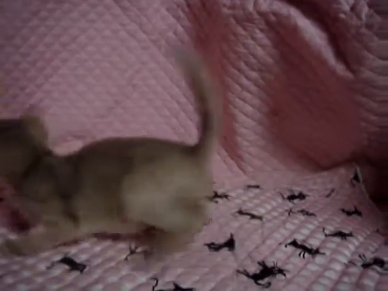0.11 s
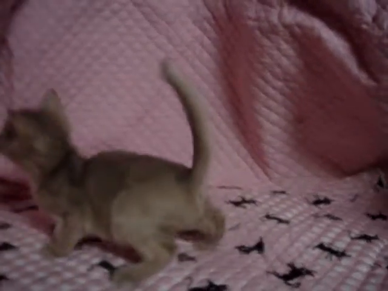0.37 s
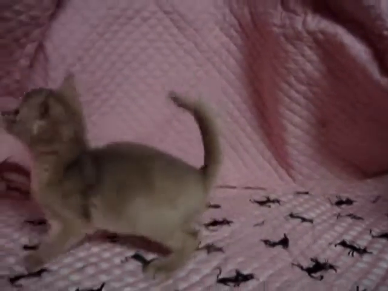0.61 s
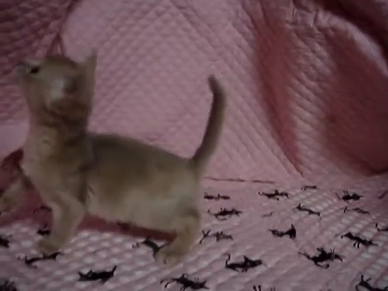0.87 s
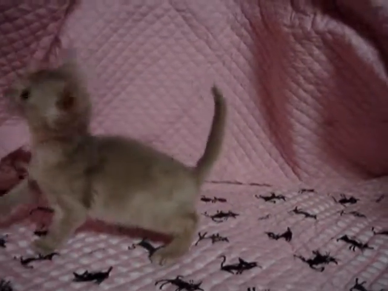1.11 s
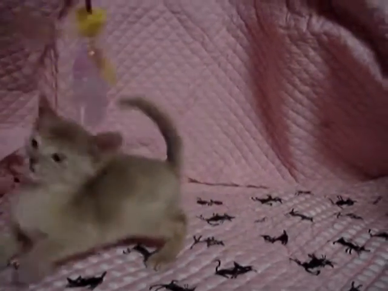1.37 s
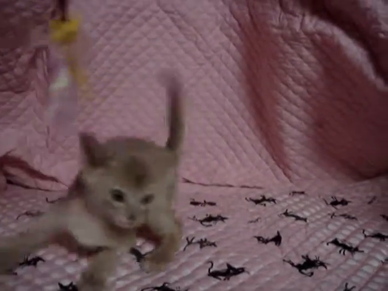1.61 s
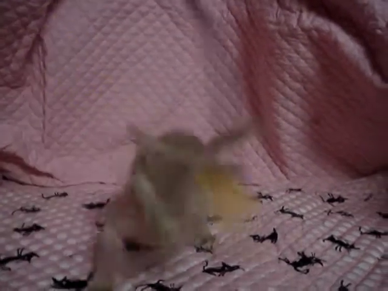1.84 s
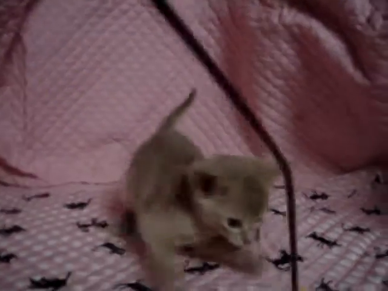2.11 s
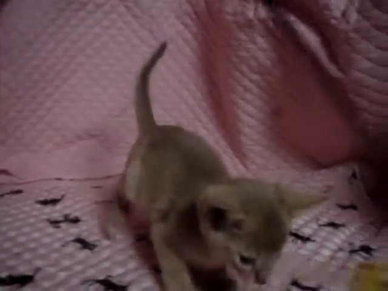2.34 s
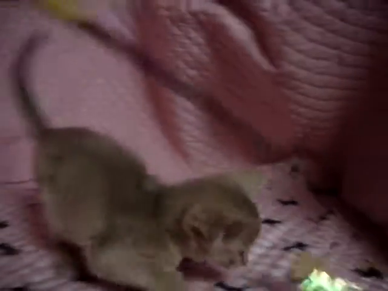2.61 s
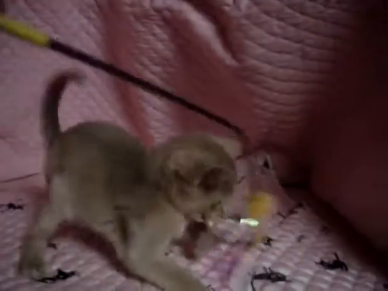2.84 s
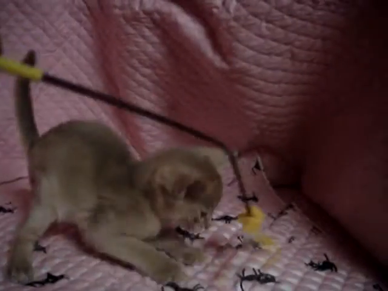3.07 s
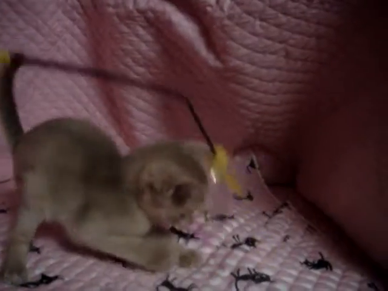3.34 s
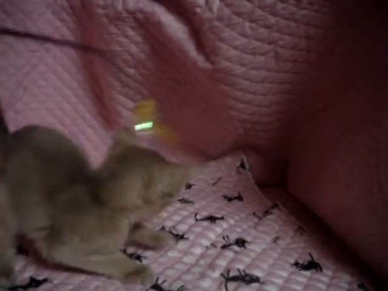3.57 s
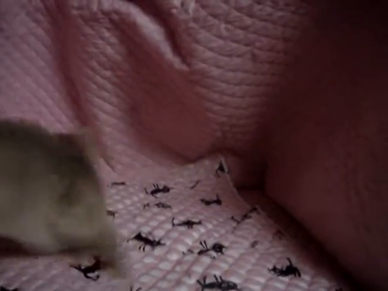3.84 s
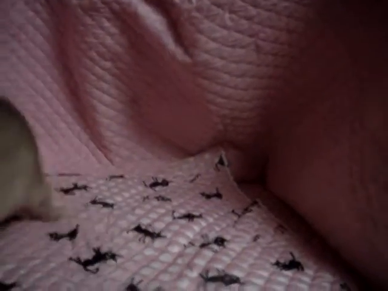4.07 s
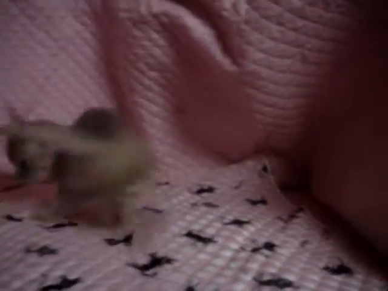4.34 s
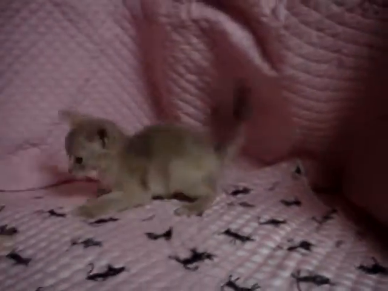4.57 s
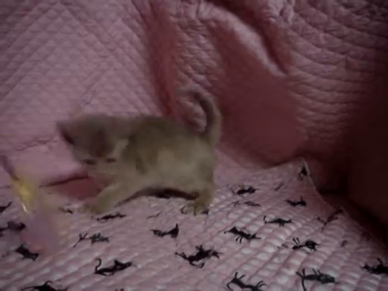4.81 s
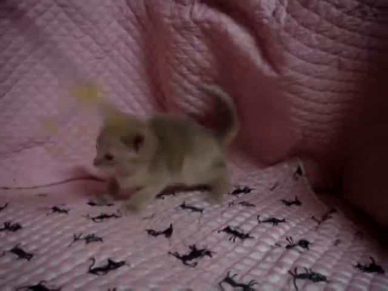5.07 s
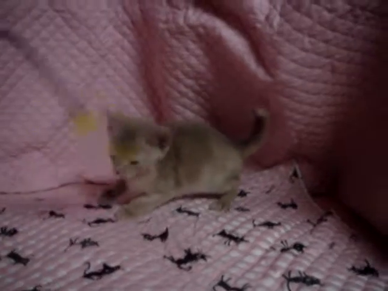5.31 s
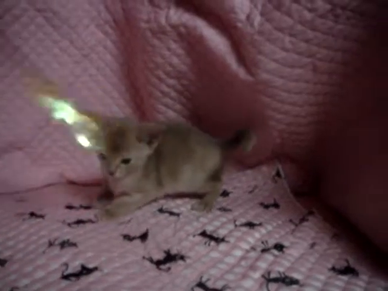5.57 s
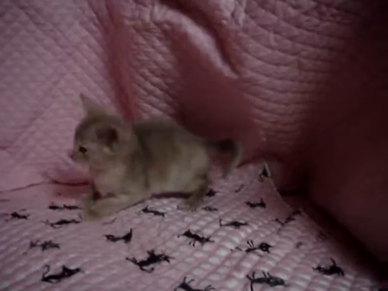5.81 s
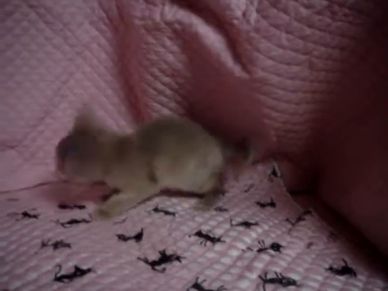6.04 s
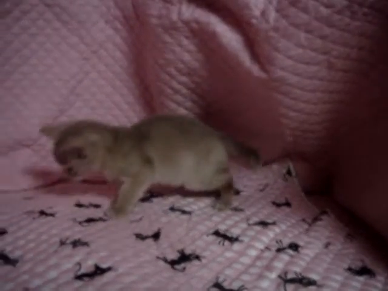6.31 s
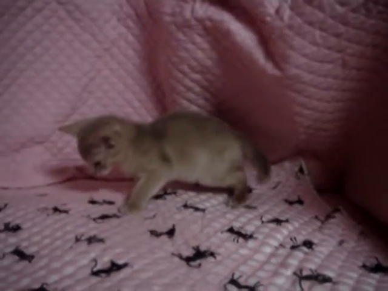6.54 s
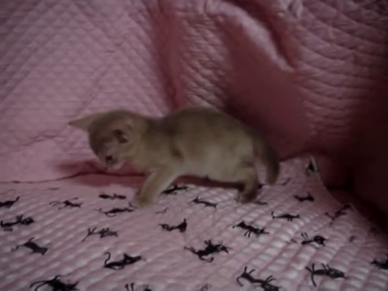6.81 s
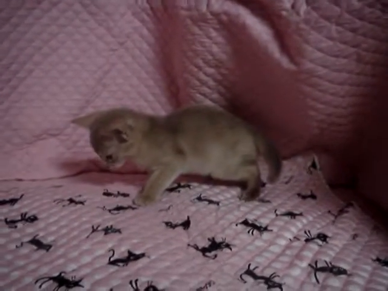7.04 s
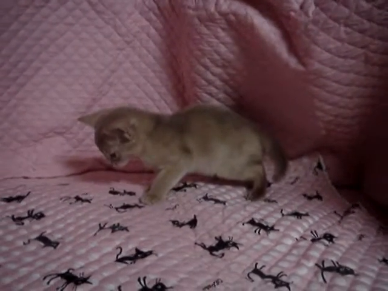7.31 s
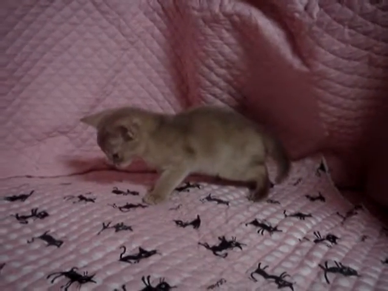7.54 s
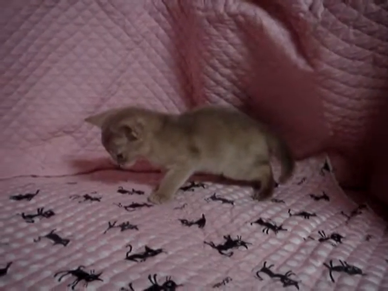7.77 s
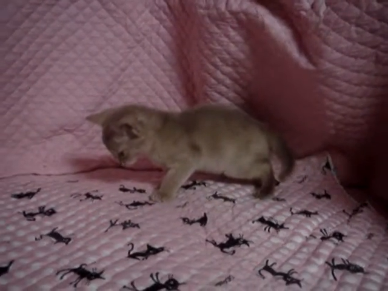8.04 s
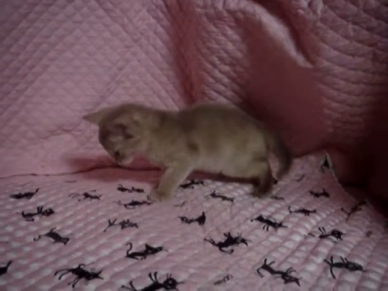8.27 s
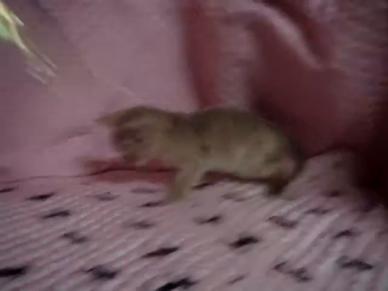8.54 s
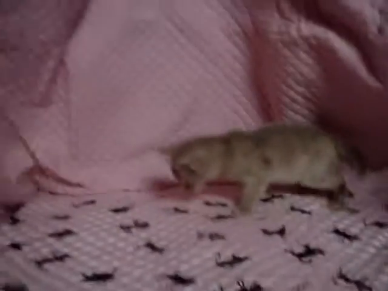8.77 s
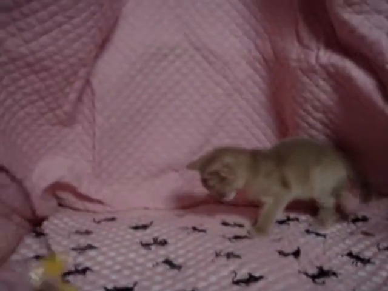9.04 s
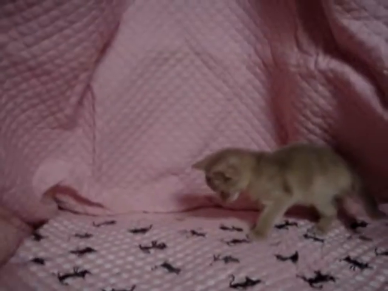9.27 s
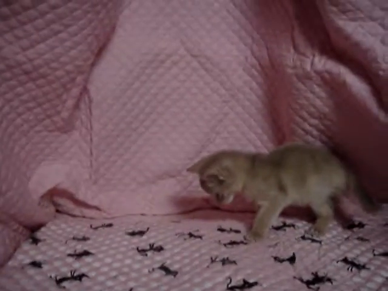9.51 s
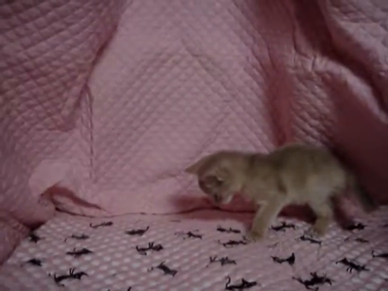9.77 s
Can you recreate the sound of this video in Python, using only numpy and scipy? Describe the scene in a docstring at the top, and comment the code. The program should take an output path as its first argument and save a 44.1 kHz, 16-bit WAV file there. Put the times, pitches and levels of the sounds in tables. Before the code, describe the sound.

Small claws scratch and snap across padded cloth in uneven bursts, with soft paw thuds, beneath steady room hiss and a thin high whine.

```python
"""On a quilted blanket, close to a small camera, a kitten scrabbles, pounces and bats a foil toy.
Cloth and foil crinkle in dense grains of noise; claws catch in short swells of noise (rips) and
ringing clicks (snaps); narrow noise chirps; paws thud as soft, low, dying tones.
Under it lie filtered noise for room and circuit hiss, and the camera's whine, steady tones whose
sign flips at every frame."""
import sys
import numpy as np
from scipy import signal
from scipy.fft import rfft, irfft, next_fast_len
from scipy.io import wavfile
from scipy.ndimage import uniform_filter1d, minimum_filter1d

SR = 44100
rng = np.random.default_rng(int(sys.argv[2]) if len(sys.argv) > 2 else 0)


def undo_db(level):
    """Turn decibels back into plain size, where 20 dB means ten times bigger."""
    steps = np.asarray(level, float) / 20
    return 10 ** steps


def wrap_up_sound(samples):
    """Save the sound to the file named by the first command line argument, as 16-bit audio."""
    columns = np.atleast_2d(samples).T
    # keep every value between -1 and 1, then stretch to whole-number steps
    tamed = np.clip(columns, -1, 1)
    steps = np.round(tamed * 32767).astype(np.int16)
    wavfile.write(sys.argv[1], SR, steps)


N = 436149
T = np.arange(N) / SR  # time of each sample, s


def unit(x):
    """Scale a sound to an rms of 1."""
    return x / np.sqrt(np.mean(x ** 2))


def colour(x, points, rings=()):
    """Filter by (hz, db) points and optional resonances (hz, width_hz, db); rms 1."""
    size = next_fast_len(len(x))
    hz = np.maximum(np.arange(size // 2 + 1) * SR / size, 1)
    point_hz, point_db = np.transpose(points)
    db = np.interp(np.log(hz), np.log(point_hz), point_db)
    for ring_hz, width_hz, ring_db in rings:
        db = db + ring_db / (1 + (2 * (hz - ring_hz) / width_hz) ** 2)
    return unit(irfft(rfft(x, size) * undo_db(db), size)[:len(x)])


def band(x, hz, share):
    """Resonance around hz; its width is a share of the centre."""
    b, a = signal.iirpeak(min(hz, 10000), 1 / max(share, .1), fs=SR)
    return signal.lfilter(b, a, x)


def walk(rate):
    """Random levels that slide to a new value every 1 / rate s; rms near 1."""
    hold = int(SR / rate)
    steps = np.repeat(rng.standard_normal(N // hold + 1), hold)
    return unit(uniform_filter1d(steps, hold))[:N]


def crinkle(rate, spread_db, hiss):
    """Fibres slip as random ticks of very unequal size over a finer hiss; rate is ticks per s."""
    sizes = undo_db(spread_db * np.minimum(rng.exponential(size=N), 3.5))
    ticks = (rng.random(N) < rate / SR) * rng.standard_normal(N) * sizes
    return unit(unit(ticks) + hiss * rng.standard_normal(N))


def patchy(x, top_db, patchy_db, rate):
    """Different folds speak in different bands: each third-octave flickers alone; top_db tilts the treble."""
    spectrum, hz = rfft(x), np.arange(N // 2 + 1) * SR / N
    place = 3 * np.log2(np.maximum(hz, 1000) / 1000)  # third-octaves above 1000 Hz
    out = 0
    for k in range(12):
        part = irfft(spectrum * np.maximum(1 - abs(place - k), 0), N)
        tilt = np.clip((k - 6) / 3, -.5, 1)
        out = out + part * undo_db(patchy_db * walk(rate) + top_db * tilt)
    return out / undo_db(patchy_db ** 2 * np.log(10) / 20)  # offsets the power the flicker adds


# Faint fidgeting between the strokes: start_s, level_db
FIDGETING = [(0, -59.5), (.8, -66.5), (1.0, -49.5), (1.12, -58), (1.4, -60.5), (1.75, -56.5), (1.95, -57),
             (2.3, -53.5), (2.4, -57), (2.8, -57), (3.7, -63), (4.0, -53.5), (4.85, -58.5), (5.3, -63.5),
             (5.9, -55.5), (8.0, -58.5), (8.6, -58.5), (9.6, -58.5), (9.89, -59)]
# Paw strokes dragging over the quilt: start_s, length_s, level_db, change_db (along the stroke),
# treble_db (tilt of the treble against the rest)
PAW_STROKES = [(0.202, 0.2, -54, 9, -0.5), (0.409, 0.17, -43.5, -6, 0.5), (0.584, 0.07, -45, 2.5, 2.5),
               (0.778, 0.033, -48, 2, -4), (1.058, 0.019, -53, 0, 2), (1.735, 0.027, -49.5, 0, -6),
               (1.997, .02, -53, 2, -5), (2.618, 0.057, -50.5, 11, 3), (2.686, 0.026, -39.5, -4, -1.5),
               (2.724, 0.075, -47.5, -8, -2), (3.954, 0.051, -55, 10.5, -8), (4.031, 0.22, -54.5, 6, -8),
               (4.321, 0.048, -48.5, 7.5, -9.5), (4.462, 0.13, -57, 7.5, -8), (4.611, 0.076, -35.5, -25, 6),
               (4.739, 0.12, -49, -5, 0), (5.02, 0.1, -60, 0, -4), (5.724, 0.055, -40, -5, -2),
               (5.8, 0.086, -53.5, 4, 0), (5.97, 0.13, -48, 9.5, -1), (6.107, .035, -38.5, -2, -2),
               (6.168, 0.064, -31, -6.5, -0.5), (6.34, 0.043, -43.5, 10, 1), (6.386, 0.084, -36.5, 6.5, -2),
               (6.48, .03, -43.5, 1, 2), (6.524, 0.077, -32.5, 2.5, 0), (6.614, 0.056, -26, -11, -2),
               (6.701, 0.03, -45, 7, -0.5), (6.744, 0.12, -32.5, -10, 0.5),
               (6.894, 0.029, -37.5, 14.5, 1.5), (6.944, 0.11, -27.5, -15, 1), (7.109, 0.08, -35, 2.5, 1),
               (7.209, 0.064, -39.5, -8.5, 4.5), (7.295, 0.031, -36.5, 2, 0.5),
               (7.342, 0.091, -31, -10.5, -1), (7.518, 0.078, -47.5, 13, -0.5),
               (7.613, 0.072, -35, -4, -3.5), (7.702, 0.052, -50, 7, 1), (7.78, 0.062, -28.5, -11.5, -1.5),
               (7.873, 0.078, -47, 9.5, 0), (8.026, 0.035, -47.5, -7, -1.5), (8.644, 0.088, -59, -5, 2),
               (8.832, 0.061, -51, 1, -6), (8.905, 0.027, -38.5, 5.5, -1), (9.072, 0.059, -47.5, 4, -3.5),
               (9.16, .05, -42.5, -5, -1.5), (9.232, 0.042, -54, -1, -1), (9.348, 0.034, -32, -12, -3.5),
               (9.469, 0.04, -45, -4, -4.5), (9.553, 0.045, -53, 1, -2)]


def effort():
    """Fidgeting plus strokes that grip fast, swell or sag, and let go: gain and treble tilt in dB."""
    grip_s, let_go_s = 0.0068, 0.0077  # quick onset; time constant of the dying away
    fidget_treble_db = 1
    gain = undo_db(np.interp(T, *np.transpose(FIDGETING)))
    treble = gain * fidget_treble_db
    for start_s, length_s, level_db, change_db, treble_db in PAW_STROKES:
        before_s = np.maximum(start_s - T, 0)
        after_s = np.maximum(T - start_s - length_s, 0)
        edges = np.exp(-(before_s / grip_s) ** 2 - after_s / let_go_s)
        progress = np.clip((T - start_s) / length_s, 0, 1)
        stroke = edges * undo_db(level_db + change_db * progress)
        gain = gain + stroke
        treble = treble + stroke * treble_db
    return gain, treble / gain  # tilt averaged by how loud each part is


# Tone of the bright grains, shared by the rips: pitch_hz, level_db (relative)
BRIGHT_COLOUR = [(300, -37.5), (1500, -4), (2200, -1), (3000, 0), (5500, 2.5), (7000, 4), (8400, 4.5),
                 (9800, 4.5), (11000, -22.5)]
# Tone of the padded cloth's dull swish, shared by the rips: pitch_hz, level_db (relative)
DULL_COLOUR = [(60, -28), (170, -4.5), (300, -1.5), (600, -1.5), (1000, -1.5), (1800, -7.5), (3000, -14)]


def rustle():
    """Scrabbling comes in uneven clumps; bright grains above, the padded cloth's dull swish below."""
    swish_db, swish_follows = -24, 0.54  # the swish grows by 0.54 dB per dB of the bright grains
    crackle_per_s, crackle_db = 350, -9.5
    gain, treble_db = effort()
    clumps = undo_db(1.4 * walk(45) + 2.0 * walk(250))
    bright = patchy(colour(crinkle(3994, 0.55, 0.58), BRIGHT_COLOUR), treble_db, 2.12, 60)
    dull = colour(crinkle(1500, 3.1, 0.96), DULL_COLOUR) * undo_db(swish_db)
    sparse = colour(crinkle(crackle_per_s, 3.1, 0), BRIGHT_COLOUR)
    crackle = patchy(sparse, treble_db, 7, 150)
    bright = bright + undo_db(crackle_db) * crackle
    return unit(clumps) * (gain * bright + gain ** swish_follows * dull)


# Tone of the room and circuit hiss: pitch_hz, level_db (per Hz, relative)
ROOM_COLOUR = [(12, -45.5), (20, -6), (53, -12.5), (169, -5.5), (232, -5.5), (275, -1.5), (352, -2.5),
               (461, -1), (508, 0.5), (699, -9), (850, -4), (1420, -13), (1570, -14), (1910, -17),
               (7000, -26), (8500, -21), (10500, -43.5)]
# Standing resonances of the room: pitch_hz, width_hz, boost_db
ROOM_RESONANCES = [(121, 16, 2), (314, 28, 4.5), (503, 58, -4), (858, 17, 7), (1198, 47, 5.5)]
# How loud the room noise is over time: start_s, level_db
ROOM_LOUDNESS = [(0, -48.5), (1.3, -49), (1.8, -47.5), (3.0, -47.5), (3.8, -48.5), (6.2, -49.5), (7.0, -47),
                 (8.2, -49.5), (9.89, -49)]


def room():
    """Smooth hum of the room with a few standing resonances, running into circuit hiss."""
    noise = colour(rng.standard_normal(N), ROOM_COLOUR, ROOM_RESONANCES)
    return noise * undo_db(np.interp(T, *np.transpose(ROOM_LOUDNESS)))


# The camera's whine and its two sidebands: pitch_hz, level_db (rms, between flips), phase_rad
WHINE_TONES = [(7875.04, -45.5, 0), (7625.04, -61, 0), (8125.04, -68.5, 2.5)]


def whine():
    """Line-scan leak: a tone and its two sidebands, inverted at each video frame."""
    frame_s, first_flip_s = 1 / 30.00015, .0168
    flip_ramp_s = 0.00085  # from zero to full level on either side of a flip
    turn = np.sin(np.pi * (T - first_flip_s) / frame_s) * frame_s / np.pi
    tones = 0
    for pitch_hz, level_db, phase_rad in WHINE_TONES:
        tones = tones + np.sqrt(2) * undo_db(level_db) * np.sin(2 * np.pi * pitch_hz * T + phase_rad)
    return np.clip(turn / flip_ramp_s, -1, 1) * tones


# Claws ripping over the quilting: start_s (near the swell), level_db (before the tone mix), brightest_hz
CLAW_RIPS = [(0.411, -37.5, 7000), (.6055, -46, 6560), (.6294, -44, 3560), (.7003, -44.5, 3820),
             (0.78, -37, 6080), (.799, -37, 4100), (1.061, -40, 5050), (1.0723, -38, 3600),
             (1.252, -47, 4460), (1.624, -43, 2210), (1.7449, -44.5, 4900), (1.9644, -54, 3780),
             (2.2994, -50, 2090), (2.6678, -40, 4240), (2.729, -37, 4220), (3.9794, -50, 2380),
             (4.0646, -48, 2420), (4.1086, -43, 2070), (4.136, -35.5, 1500), (4.168, -49, 4680),
             (4.2362, -35.5, 2220), (4.3251, -44, 5310), (4.3505, -39, 3680), (4.609, -24, 6200),
             (4.758, -40, 4540), (4.8, -41, 2990), (5.654, -40.5, 3080), (5.7207, -33, 4630),
             (5.8197, -40, 6950), (6.091, -25, 7400), (6.116, -29.5, 7070), (6.1714, -27, 3860),
             (6.2067, -41, 6800), (6.2287, -40, 2340), (6.3505, -47, 2620), (6.3739, -43, 4160),
             (6.389, -35.5, 7120), (6.4544, -38, 5110), (6.5246, -35, 3750), (6.566, -25, 7040),
             (6.5927, -21, 6800), (6.6194, -31, 3910), (6.6992, -51, 4130), (6.718, -35, 2310),
             (6.764, -33, 4900), (6.786, -24, 6800), (6.8094, -31, 7120), (6.836, -33.5, 6250),
             (6.85, -37, 6790), (6.89, -47, 4430), (6.9146, -19.5, 3050), (6.9511, -30, 7190),
             (6.979, -30, 6280), (7.12, -33, 4870), (7.227, -31, 4080), (7.297, -42, 6250),
             (7.3327, -34, 3460), (7.5165, -38.5, 3720), (7.5592, -34, 2420), (7.709, -34.5, 2050),
             (7.7598, -17.5, 7100), (7.7894, -39, 3600), (7.884, -34, 6540), (7.9377, -27, 2620),
             (8.377, -42.5, 5000), (8.6717, -37.5, 5600), (8.708, -41, 2880), (8.8433, -40, 2710),
             (8.901, -36, 5770), (8.9155, -26.5, 3360), (8.9509, -19, 6040), (9.0713, -45, 3100),
             (9.1127, -38, 3420), (9.1406, -37, 6220), (9.1606, -29.5, 4220), (9.2344, -38, 5440),
             (9.348, -26.5, 5660), (9.4644, -46, 2450)]


def rips():
    """Each rip is a rounded swell of grains with its own bright region and a duller body."""
    soft_rise_s, hard_rise_s, fall_s = 0.0028, 0.0058, 0.0076
    hard_db, body_db = -27.5, -17  # rips around and above hard_db shift to the slower rise
    grains = crinkle(7000, 2.6, 0.97)
    wide = patchy(colour(grains, BRIGHT_COLOUR), 0, 3.54, 90)
    dull = colour(grains, DULL_COLOUR)
    out, t = np.zeros(N), np.arange(4096) / SR
    for start_s, level_db, brightest_hz in CLAW_RIPS:
        hardness = 1 / (1 + undo_db(3 * (hard_db - level_db)))
        rise_s = soft_rise_s + (hard_rise_s - soft_rise_s) * hardness
        peak_s = 2 * rise_s
        swell = np.exp(-((t - peak_s) / np.where(t < peak_s, rise_s, fall_s)) ** 2)
        i = int((start_s - 1.26 * rise_s) * SR)
        part = wide[i:i + len(t)]
        bright = unit(band(part, brightest_hz, 0.44))
        tone = 0.45 * part + 0.44 * bright + undo_db(body_db) * dull[i:i + len(t)]
        out[i:i + len(t)] += undo_db(level_db) * swell * tone
    return out


# Single threads or foil creases letting go: start_s, level_db (before the decay), pitch_hz
THREAD_SNAPS = [(0.411, -27, 7000), (0.4224, -32, 6850), (0.7003, -44, 3820), (0.7813, -24, 6120),
                (1.062, -20.5, 5000), (2.5242, -34, 5990), (4.5173, -32, 3800), (4.7421, -31, 6050),
                (4.7622, -21, 4500), (5.722, -19, 4600), (6.169, -27, 3820), (6.203, -10, 6900),
                (6.2307, -31, 3600), (6.3595, -22, 3850), (6.3734, -19, 7000), (6.5257, -30, 3750),
                (6.567, -19, 4990), (6.72, -19, 4620), (6.765, -20, 4900), (6.786, -23, 6820),
                (6.8374, -26, 6270), (7.122, -12.5, 4870), (7.227, -23, 4080), (7.5605, -10.5, 6650),
                (8.6743, -25, 5550), (8.844, -37, 2710), (8.9524, -12, 6770), (9.072, -28, 3100),
                (9.112, -26, 3420)]


def snaps():
    """A lone click that rings for a cycle or two."""
    out, t = np.zeros(N), np.arange(256) / SR
    for start_s, level_db, pitch_hz in THREAD_SNAPS:
        i = int(start_s * SR)
        ring = np.sin(2 * np.pi * pitch_hz * t) * np.exp(-t * pitch_hz / 1.7)
        out[i:i + len(t)] += undo_db(level_db) * ring
    return out


# Thin short chirps, perhaps the foil: start_s, length_s, level_db, pitch_hz
FOIL_CHIRPS = [(1.875, .03, -55, 4250), (3.855, 0.038, -51, 4350)]


def chirps():
    """A narrow, breathy whistle: noise sent twice through a resonance, in a rounded swell."""
    noise, out = rng.standard_normal(N), 0
    for start_s, length_s, level_db, pitch_hz in FOIL_CHIRPS:
        half_s = length_s / 2
        swell = np.exp(-((T - start_s - half_s) / half_s) ** 2)
        whistle = unit(band(band(noise, pitch_hz, 0.11), pitch_hz, 0.11))
        out = out + undo_db(level_db) * swell * whistle
    return out


# Paws landing on the padding: start_s, level_db (peak of the push), pitch_hz
PAW_THUDS = [(2.307, -40, 547), (2.719, -52, 29.6), (2.741, -41, 259), (2.889, -52, 67.3), (2.93, -40, 227),
             (3.139, -50, 26.9), (4.199, -53, 108), (4.299, -57, 112), (4.508, -40.5, 108),
             (4.611, -44, 615), (5.716, -42, 216), (6.17, -36.5, 306), (6.588, -48, 200), (6.618, -47, 417),
             (6.784, -39, 503), (6.919, -38, 26.9), (7.559, -41, 26), (7.598, -42, 512), (7.778, -50, 278),
             (7.799, -43, 380), (8.951, -35, 207), (9.166, -37, 214)]


def thuds():
    """A soft push sets the padding swinging low and briefly; higher thuds die a little sooner."""
    out, t = np.zeros(N), np.arange(8192) / SR
    for start_s, level_db, pitch_hz in PAW_THUDS:
        i = int(start_s * SR)
        ring_s = 0.099 * (200 / pitch_hz) ** 0.1  # time to fall by 60 dB
        push = (1 - np.exp(-t / 0.0012)) * np.exp(-np.log(1000) * t / ring_s)
        out[i:i + len(t)] += undo_db(level_db) * push / push.max() * np.sin(2 * np.pi * pitch_hz * t)
    return out


def scene():
    """Everything reaches one microphone."""
    mix = rustle() + room() + whine() + rips() + snaps() + chirps() + thuds()
    return mix[None]


def starve(x, under_db, tilt_db, soft_db):
    """Fine sound far under the stroke level goes missing, also just before and after a stroke."""
    hz, _, z = signal.stft(x, SR, nperseg=384)
    db = 10 * np.log10(uniform_filter1d(abs(z) ** 2, size=5, axis=0) + 1e-16)
    middle_db = np.median(db[15:85], axis=0)  # about 1.7 to 9.8 kHz
    stroke_db = -minimum_filter1d(-middle_db, size=9, origin=1)  # loudest of the nearby moments
    octaves = np.log2(np.clip(hz, 100, 6500) / 6500)[:, None]
    bar_db = stroke_db - under_db + tilt_db * octaves  # the bar sinks below 6500 Hz
    keep = 1 / (1 + np.exp(np.clip((bar_db - db) / soft_db, -30, 30)))
    return signal.istft(z * keep, SR, nperseg=384)[1][:N]


def band_limit(x):
    """A steep low-pass at the top of the band."""
    return signal.sosfilt(signal.butter(12, 10550, fs=SR, output="sos"), x)


def record(dry):
    """The camera thins the treble, then cuts the top steeply."""
    thin = starve(dry[0], under_db=4.5, tilt_db=14.0, soft_db=1.1)
    top_cut = signal.ellip(12, .3, 70, 10150, fs=SR, output="sos")  # low-pass at 10150 Hz
    mix = signal.sosfilt(top_cut, thin)[None]
    return band_limit(mix)


dry = scene()
out = record(dry)
wrap_up_sound(out)
```